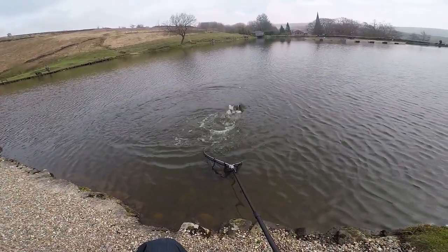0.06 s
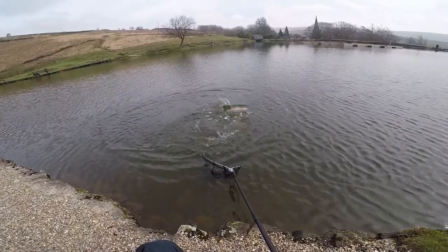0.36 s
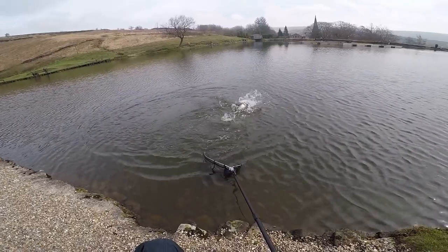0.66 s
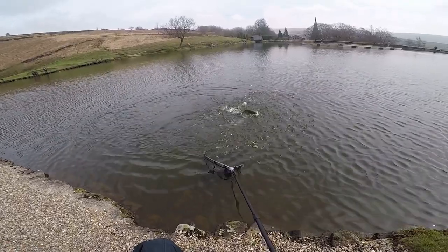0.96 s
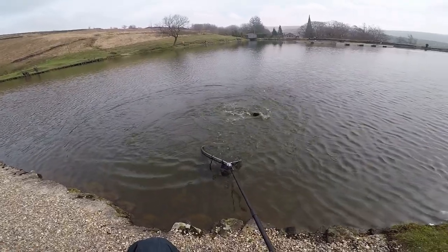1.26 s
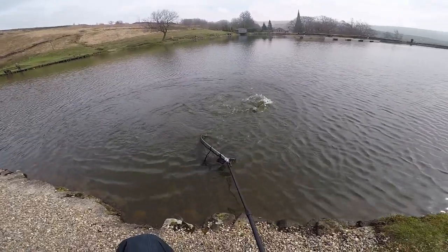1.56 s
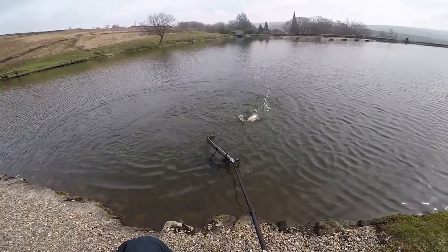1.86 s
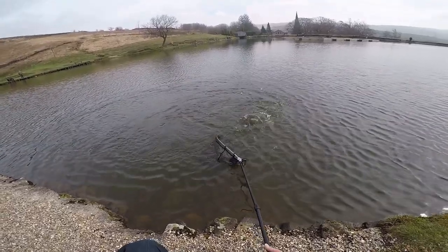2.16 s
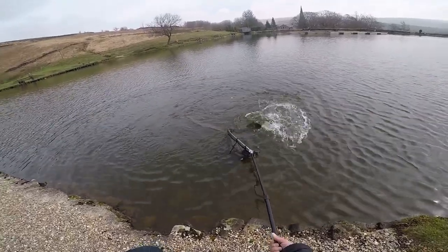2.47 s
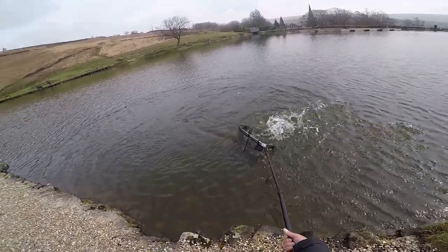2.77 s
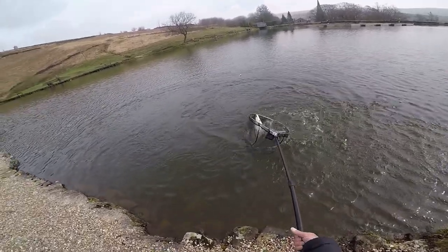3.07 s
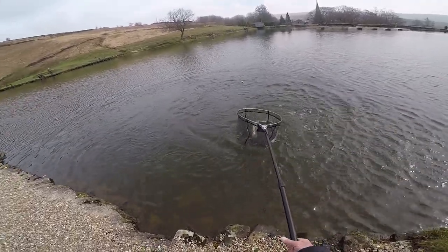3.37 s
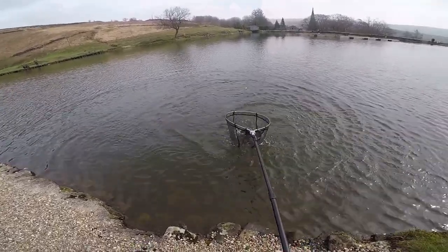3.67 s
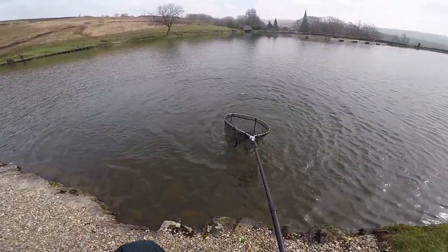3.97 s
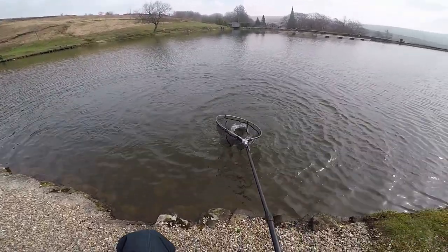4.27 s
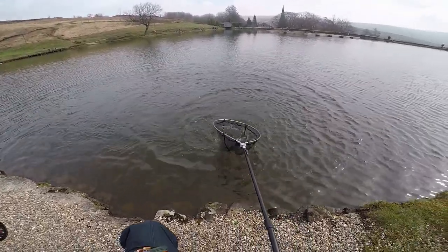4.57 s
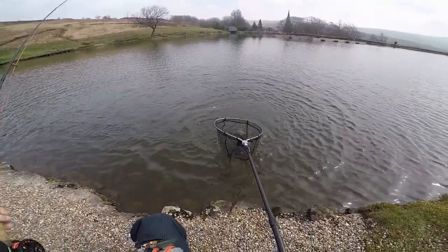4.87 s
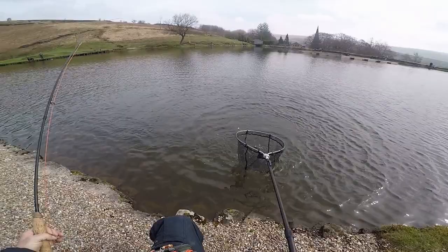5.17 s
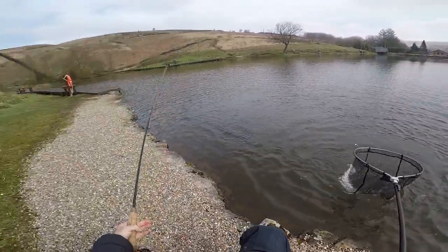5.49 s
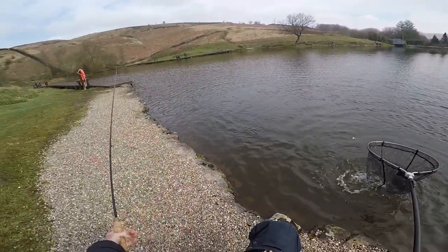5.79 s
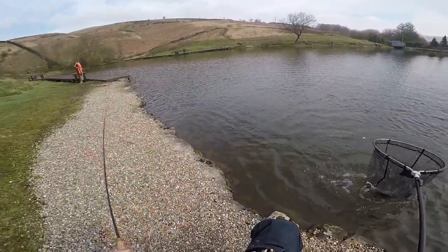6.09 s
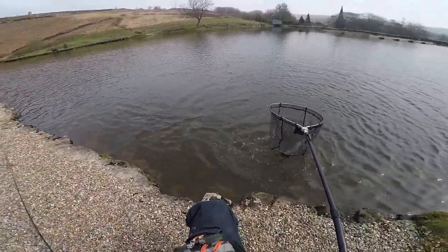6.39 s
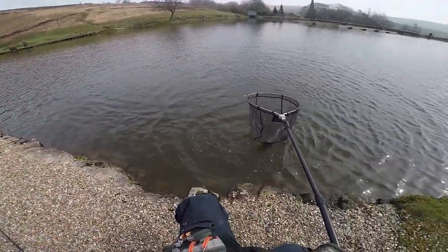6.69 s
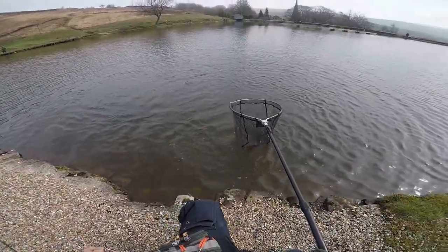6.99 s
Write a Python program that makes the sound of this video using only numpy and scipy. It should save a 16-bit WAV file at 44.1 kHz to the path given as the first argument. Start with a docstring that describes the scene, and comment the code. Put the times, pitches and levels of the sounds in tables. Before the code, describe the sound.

Bursts of splashing, plops and pattering spray from a struggling fish, with wind buffeting the microphone and brief gravel scrapes at the end.

```python
"""A hooked fish thrashes at the surface of a lake while wind rumbles on the microphone.
Its tail slaps the water, traps air that rings as rising bubbles, and throws spray that patters back.
The splashing comes in bursts as the fish is scooped into a dripping landing net.
Late on, far birds call faintly, and fishing tackle scrapes on the gravel bank."""
import sys
import numpy as np
from scipy import signal
from scipy.fft import rfft, irfft
from scipy.io import wavfile
from scipy.ndimage import uniform_filter1d

SR = 44100
rng = np.random.default_rng(int(sys.argv[2]) if len(sys.argv) > 2 else 0)


def int16_out(signal):
    """Quantize to a 16-bit WAV file."""
    q = np.round(np.clip(np.atleast_2d(signal).T, -1, 1) * 32767)
    wavfile.write(sys.argv[1], SR, q.astype(np.int16))


N = 310576
TIME = np.arange(N) / SR

# tone of splashes as coloured by the microphone, with a peak near 4.3 kHz and duller above 5 kHz:
# pitch_hz, relative_db
SPLASH_MIC_TONE = [(500, 1.5), (1500, 5), (2200, -3), (3000, -4.5), (4000, 3.5), (4600, 3.5), (5400, -14.5),
                   (6500, -10.5), (7800, -20), (10000, -14.5), (11200, -23), (12600, -20), (15000, -34)]
# brighter tone of the finest drops: pitch_hz, relative_db
MIST_TONE = [(3500, -3), (6500, -4), (10000, -9), (13000, -11), (15000, -13)]


def undb(db):
    """Turn decibels into a number to multiply a sound by."""
    return 10 ** (np.asarray(db) / 20)


def unit(x):
    """Scale a signal to an average power of 1."""
    return x / np.sqrt(np.mean(x ** 2) + 1e-20)


def add(out, start_s, sound):
    """Mix a sound in at the given time."""
    i = int(np.clip(start_s * SR, 0, N - 1))
    out[i:i + len(sound)] += sound[:N - i]


def colour(x, tone):
    """Make some pitches louder and others softer, following a tone table."""
    hz, db = np.transpose(tone)
    gain = undb(np.interp(np.log(np.fft.rfftfreq(N, 1 / SR) + 1), np.log(hz), db))
    return irfft(rfft(x) * unit(gain), N)


def wander(rate_hz):
    """A curve that slides to a new random value rate_hz times a second."""
    hold = int(SR / rate_hz)
    steps = np.repeat(rng.standard_normal(N // hold + 1), hold)
    return 2 * uniform_filter1d(steps, hold)[:N]


def eddies(tone, levels, span_s, trim_db):
    """Swirling air: low noise, evened out over span_s, then made to swell and fade."""
    swirl = colour(rng.standard_normal(N), tone)
    swirl /= np.sqrt(uniform_filter1d(swirl ** 2, int(span_s * SR)) + .0011)
    time_s, level_db = np.transpose(levels)
    return swirl * undb(np.interp(TIME, time_s, level_db) + trim_db)


def wind():
    """Gusts rumble and buffet on the microphone, above the hush of open country."""
    # tones of the slow rumble, the quicker buffeting and the hush: pitch_hz, relative_db
    rumble_tone = [(5, 9), (13, 3.5), (26, 10.5), (42, 5.5), (60, -17), (120, -69.5)]
    buffet_tone = [(35, -17), (65, -3), (100, -7), (160, -21), (300, -28), (700, -71)]
    hush_tone = [(60, -1), (230, -4.5), (400, -11.5), (900, -17.5), (2200, -24), (3100, -29), (4400, -27),
                 (5500, -32), (7500, -32.5), (9800, -30.5), (11300, -37), (13000, -39.5), (15400, -41)]
    # strength of the gusts, before trim_db is added: time_s, level_db
    rumble_levels = [(0.0, -56.5), (0.2, -39.5), (0.48, -50), (0.68, -40.5), (1.2, -47), (2.04, -50.5),
                     (2.4, -45.5), (2.48, -53.5), (3.08, -36), (3.2, -50.5), (3.4, -39), (3.64, -49),
                     (4.0, -49), (4.2, -42), (5.08, -48.5), (6.08, -45), (6.2, -53), (7.04, -48.5)]
    buffet_levels = [(0.0, -50.5), (0.36, -54), (0.64, -48.5), (0.72, -55), (2.04, -65), (2.92, -48.5),
                     (2.96, -56), (3.08, -44.5), (3.16, -49.5), (3.8, -58), (3.88, -56.5), (4.08, -60),
                     (4.24, -49), (4.32, -57.5), (4.76, -63), (6.52, -60.5), (6.6, -69), (7.04, -63.5)]
    rumble = eddies(rumble_tone, rumble_levels, span_s=.22, trim_db=-2.5)
    buffets = eddies(buffet_tone, buffet_levels, span_s=.09, trim_db=-2)
    hush = colour(rng.standard_normal(N), hush_tone) * undb(-67)
    return rumble + buffets + hush


def stirring(starts_s, rises_s, levels_db, calm_db=-88, lapping_db=-17, settle_s=.33):
    """Loudness of the water in dB: each heave swells, falls back and leaves gentle lapping."""
    t = TIME[::64]
    power = undb(calm_db) ** 2  # ripples at the bank
    for start_s, rise_s, level_db in zip(starts_s, rises_s, levels_db):
        age = np.maximum(t - start_s, 0)
        swell = age / rise_s * np.exp(1 - age / rise_s)
        lapping = undb(lapping_db) * np.minimum(age / rise_s, 1) * np.exp(-age / settle_s)
        power = power + undb(level_db) ** 2 * (swell ** 2 + lapping ** 2)
    return np.interp(TIME, t, 10 * np.log10(power))


def crowding(level_db):
    """The chance, 0 to 1, that a drop or bubble sounds: harder stirring makes more of them."""
    return undb(.8 * (level_db - level_db.max()))


def follow(drops, level_db):
    """Make drops or bubbles follow a loudness curve: size makes up what their number does not."""
    shaped = drops * undb(level_db) / np.sqrt(crowding(level_db))
    return unit(shaped) * np.sqrt(np.mean(undb(level_db) ** 2))


def patter(level_db, most_per_s=9000):
    """Falling spray hits the water as tiny clicks of random size."""
    size = undb(-3 * np.minimum(rng.exponential(size=N), 4))
    hits = rng.random(N) < crowding(level_db) * most_per_s / SR
    return follow(hits * size * rng.choice([-1, 1], N), level_db)


def bubble(hz, decay_s, rise, onset_cycles=.47):
    """Trapped air rings; nearing the surface, its pitch climbs by `rise` octaves per decay_s."""
    t = np.arange(int(6 * decay_s * SR) + 8) / SR
    pitch = hz * 2 ** (rise * np.minimum(t / decay_s, 4))
    swell = (1 - np.exp(-(t * hz / onset_cycles) ** 2)) * np.exp(-t / decay_s)
    return swell / swell.max() * np.sin(2 * np.pi * np.cumsum(pitch) / SR)


def swarm(level_db, low_hz, high_hz, cycles, rise, spread_db, tries):
    """Small bubbles of random pitch, length and size: few in a lull, many in a splash."""
    out, chance = np.zeros(N), crowding(level_db)
    for when, pitch, life, size, climb, luck in rng.random((tries, 6)):
        if luck < chance[int(when * N)]:
            hz = low_hz * (high_hz / low_hz) ** pitch
            gain = undb(-spread_db * np.log(max(size, .03)))
            decay_s = cycles * (.5 + life) / hz
            add(out, when * N / SR, gain * bubble(hz, decay_s, 2 * rise * climb))
    return follow(out, level_db)


def stirred_water():
    """Each heave sloshes the water; froth bursts a little later, then spray patters and pings."""
    # heaves of the fish or the net: start_s, rise_s, heave_db, thrown_db (the spray thrown up)
    heaves = [(-.03, 0.038, -58.5, -72.5), (0.132, 0.044, -58.5, -71), (0.329, 0.045, -65, -72),
              (0.519, 0.011, -57, -68.5), (0.601, 0.042, -70, -75), (0.729, .07, -68.5, -66.5),
              (.91, 0.038, -59, -71.5), (1.031, 0.056, -59, -75.5), (1.25, 0.085, -66, -73),
              (1.462, 0.018, -59, -75.5), (1.59, 0.068, -70.5, -74.5), (1.715, 0.069, -63, -77.5),
              (2.019, 0.041, -69, -73), (2.199, 0.033, -68.5, -71), (2.478, 0.051, -61, -64.5),
              (2.654, 0.024, -58.5, -64.5), (2.731, 0.049, -64.5, -67), (2.815, 0.036, -53.5, -63),
              (2.978, 0.043, -58, -68.5), (3.59, 0.047, -71, -72.5), (3.798, 0.046, -70, -77.5),
              (4.324, .016, -54, -68.5), (4.38, .045, -64.5, -77.5), (5.36, 0.021, -66, -76.5),
              (5.471, 0.033, -82, -69), (5.555, 0.008, -65.5, -85), (5.679, 0.043, -63, -69.5),
              (5.829, 0.025, -64.5, -68), (5.99, 0.055, -68.5, -78.5), (6.46, 0.037, -71, -78),
              (6.88, 0.12, -69.5, -78.5)]
    start_s, rise_s, heave_db, thrown_db = np.transpose(heaves)
    slosh_db = stirring(start_s, rise_s, heave_db)
    froth_db = stirring(start_s, 1.3 * rise_s, heave_db - 5.5)
    spray_db = stirring(start_s, 1.83 * rise_s, thrown_db)
    clicks = patter(spray_db + .5) * undb(2.47 * wander(110))  # spray falls in clumps
    droplets = swarm(spray_db - 5.5, 1815, 8330, cycles=4, rise=.053, spread_db=2.5, tries=7000)
    # the finest drops tick brightly; hard strokes throw far more of them
    mist_db = spray_db.max() + 1.6 * (spray_db - spray_db.max()) - 9.5
    mist = swarm(mist_db, 5550, 14300, cycles=4.9, rise=0, spread_db=4.5, tries=2600)
    froth = swarm(froth_db, 629, 2500, cycles=3.1, rise=.15, spread_db=6, tries=13000)
    slosh = swarm(slosh_db - .5, 173, 642, cycles=2, rise=.1, spread_db=4, tries=7000)
    return colour(clicks + droplets, SPLASH_MIC_TONE) + colour(mist, MIST_TONE) + froth + slosh


def air_pockets(closing_s=.0022):
    """The loudest single bubbles: bigger ones ring lower and longer."""
    # air trapped by the fish, the net and falling drops: start_s, pitch_hz, level_db
    pockets = [(.002, 265.5, -33), (0.026, 426, -46.5), (0.069, 255, -46), (0.094, 245, -43.5),
               (0.112, 277, -38), (0.17, 800, -54.5), (0.182, 1340, -47.5), (0.21, 188, -45),
               (0.266, 3630, -54), (.372, 1900, -56), (.529, 497, -40), (.712, 875, -51),
               (.920, 643, -44.5), (.938, 1070, -53), (1.046, 587, -47), (1.120, 380, -52),
               (1.485, 1410, -46), (1.49, 370, -51.5), (1.746, 760, -45), (2.024, 3950, -56),
               (2.118, 4420, -53), (2.19, 164, -45), (2.232, 1660, -55), (2.296, 4500, -49),
               (2.575, 574, -51), (2.590, 687, -52), (2.626, 525, -46.5), (2.671, 1580, -46),
               (2.702, 1574, -44), (2.706, 346, -39), (2.716, 366, -36), (2.722, 650, -45),
               (2.836, 516, -38.5), (2.842, 239, -38), (2.879, 219, -43.5), (2.997, 192, -38.5),
               (3.258, 1540, -55), (3.667, 1570, -60), (3.9, 1035, -59), (4.019, 2370, -62),
               (4.186, 1570, -61), (4.332, 732, -51), (4.340, 2010, -48), (4.349, 472, -45),
               (4.359, 358, -46), (4.37, 215, -41), (5.318, 1260, -57), (5.356, 1200, -56),
               (5.371, 1750, -52), (5.760, 1300, -50), (5.772, 1940, -53), (5.851, 2430, -55.5),
               (5.725, 550, -51), (5.861, 370, -50.5), (5.913, 714, -47.5), (6.024, 1160, -52.5),
               (6.089, 405, -53), (6.272, 2340, -57)]
    out = np.zeros(N)
    for start_s, hz, level_db in pockets:
        decay_s = .00367 * (1000 / hz) ** .68
        # the first pockets climb fastest; tiny, high ones die before they can rise
        rise = .147 * (1.8 if start_s < .05 else 1) / (1 + (hz / 3200) ** 2)
        add(out, start_s, undb(level_db) * bubble(hz, decay_s, rise, onset_cycles=closing_s * hz))
    return out


def plunges(closing_s=.023):
    """A hollow opens in the water with a plop, then closes into a lower, ringing bubble."""
    # hollows in the water: start_s, plop_hz, plop_db, ring_db
    hollows = [(.528, 802, -38, -53), (1.829, 934, -47, -56.5), (2.658, 705, -42, -47.5),
               (2.8868, 1060, -38.5, -56), (4.3225, 1320, -37.5, -65), (5.569, 846, -36, -48.5)]
    out = np.zeros(N)
    for start_s, plop_hz, plop_db, ring_db in hollows:
        ring_hz = .61 * plop_hz
        add(out, start_s, undb(plop_db) * bubble(plop_hz, decay_s=1.1 / plop_hz, rise=.057))
        add(out, start_s + closing_s, undb(ring_db) * bubble(ring_hz, decay_s=10 / ring_hz, rise=.046))
    return out


def burst(decay_s):
    """Many tiny hits blur into a puff of noise that builds quickly and dies away."""
    t = np.arange(SR // 4) / SR
    swell = (1 - np.exp(-(t / (.43 * decay_s)) ** 2)) * np.exp(-t / decay_s)
    return rng.standard_normal(len(t)) * swell / swell.max()


def slaps():
    """The tail and falling sheets of water hit the lake: a bright crack, then a short splash."""
    # hits on the surface: start_s, level_db, decay_s
    hits = [(0.529, -51.5, 0.0025), (0.622, -55, 0.013), (0.711, -57, 0.014), (0.885, -56.5, 0.015),
            (1.153, -56, 0.0058), (1.748, -55.5, 0.014), (1.79, -57.5, .0047), (2.118, -64, 0.0028),
            (2.288, -63, .007), (2.574, -49, .0012), (2.593, -59.5, 0.0037), (2.654, -54, 0.026),
            (2.671, -52, 0.0061), (2.718, -52, 0.0051), (3.280, -58.5, 0.0045), (3.338, -60, 0.0029),
            (4.321, -58.5, 0.001), (4.325, -56, 0.0035), (4.336, -49, 0.0028), (4.347, -61, 0.0054),
            (4.361, -58.5, .008)]
    splashes, cracks = np.zeros(N), np.zeros(N)
    for start_s, level_db, decay_s in hits:
        add(splashes, start_s, undb(level_db) * burst(decay_s))
        add(cracks, start_s, undb(level_db - 8) * burst(decay_s=.0001))
    return colour(splashes, SPLASH_MIC_TONE) + colour(cracks, MIST_TONE)


def birds(trill_hz=53.7):
    """Birds give thin, gliding whistles; a trill throbs in both pitch and loudness."""
    # bird calls: start_s, length_s, start_hz, end_hz, level_db, trill_depth (0 to 1)
    calls = [(4.685, 0.16, 1854, 1950, -77.5, 0.1), (5.503, 0.32, 2336, 1860, -70.5, 0.3),
             (5.842, 0.29, 2725, 2560, -69.5, 0.38), (6.249, 0.075, 4210, 4000, -67.5, 0.03),
             (6.26, 0.045, 5960, 6400, -77, 0)]
    out = np.zeros(N)
    for start_s, length_s, start_hz, end_hz, level_db, trill_depth in calls:
        progress = np.linspace(0, 1, int(length_s * SR))
        throb = trill_depth * np.sin(2 * np.pi * trill_hz * length_s * progress)
        glide_hz = start_hz + (end_hz - start_hz) * progress
        hz = glide_hz * (1 + .076 * throb + .0062 * wander(150)[:len(progress)])
        swell = np.sin(np.pi * progress) * (1 + throb / 2)
        add(out, start_s, undb(level_db) * swell * np.sin(2 * np.pi * np.cumsum(hz) / SR))
    return out


def tackle():
    """Fishing gear drags softly over gravel, scrapes, and makes the shifted stones ring."""
    # knocks and scrapes: start_s, level_db, decay_s, ring_hz
    scrapes = [(5.405, -63, 0.0095, 2200), (5.415, -47, 0.003, 3930), (6.434, -45.5, 0.0016, 2700),
               (6.433, -49.5, 0.0026, 4320), (6.483, -60, 0.027, 4700), (6.769, -59.5, 0.0091, 8350),
               (6.864, -47, 0.0075, 3050), (6.868, -50, 0.008, 1770), (6.875, -61, 0.021, 2290),
               (6.913, -55.5, 0.0031, 4940)]
    # tone of the gravel: pitch_hz, relative_db
    gravel_tone = [(400, 2.5), (1500, -5), (2500, 2.5), (4400, -2.5), (8000, -11), (15000, -34)]
    out = np.zeros(N)
    for start_s, level_db, decay_s, ring_hz in scrapes:
        grit = burst(decay_s)
        ring = signal.lfilter(*signal.iirpeak(ring_hz, Q=10, fs=SR), grit)
        add(out, start_s, undb(level_db) * (.5 * grit + undb(5.5) * ring))
        drag = burst(decay_s=.02)
        add(out, start_s - .014, undb(level_db - 17) * drag)
    return colour(out, gravel_tone)


def shore_echo(x, decay_s, echo_db):
    """Add the short echo of a sound bouncing off the water and the shore."""
    t = np.arange(SR // 3) / SR
    tail = rng.standard_normal(len(t)) * np.exp(-t / decay_s) * (t > .002)
    return x + undb(echo_db) * signal.fftconvolve(x, tail / np.linalg.norm(tail))[:N]


def scene():
    """Mix near water and tackle, far birds with more echo, and wind into one channel."""
    water = air_pockets() + plunges() + slaps() + stirred_water()
    near = shore_echo(water + tackle(), decay_s=.018, echo_db=-13.5)
    far = undb(-1.5) * shore_echo(birds(), decay_s=.11, echo_db=-2)
    return (near + far + wind())[None]


def record(dry):
    """A steep filter cuts away the highest treble."""
    top_hz = 15000
    return signal.sosfilt(signal.ellip(8, .2, 70, top_hz, fs=SR, output="sos"), dry)


dry = scene()
out = record(dry)
int16_out(out)
```